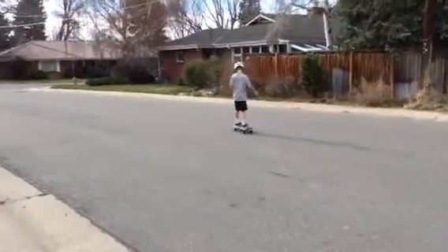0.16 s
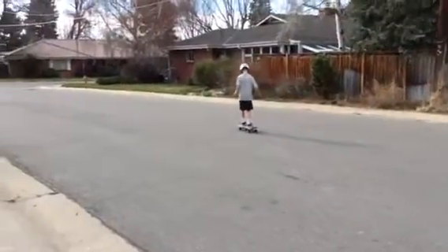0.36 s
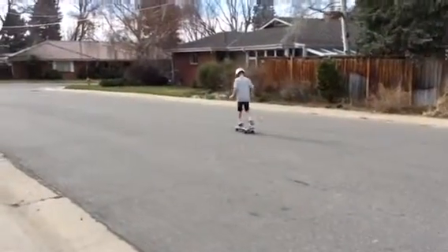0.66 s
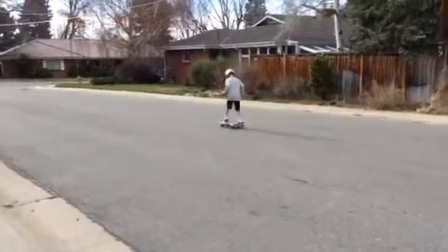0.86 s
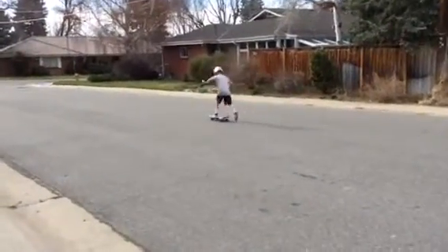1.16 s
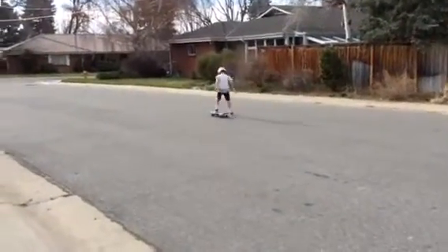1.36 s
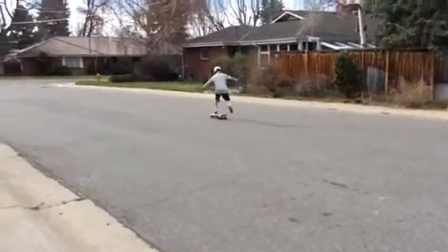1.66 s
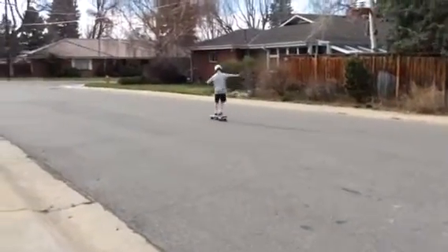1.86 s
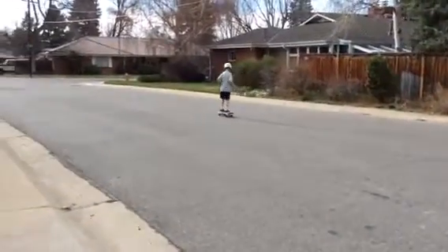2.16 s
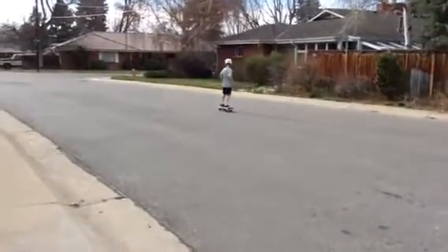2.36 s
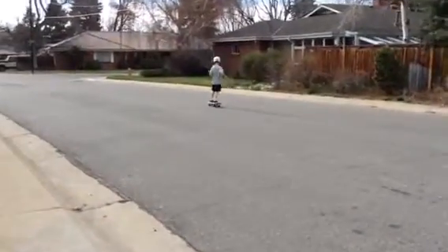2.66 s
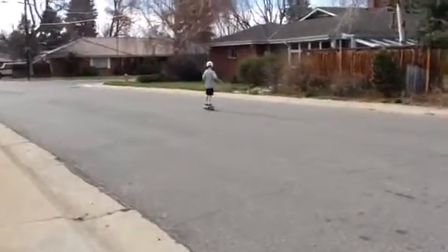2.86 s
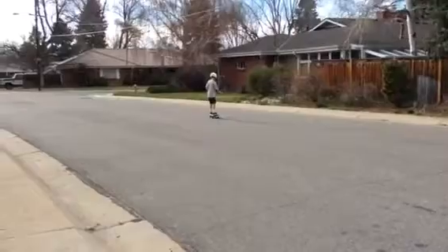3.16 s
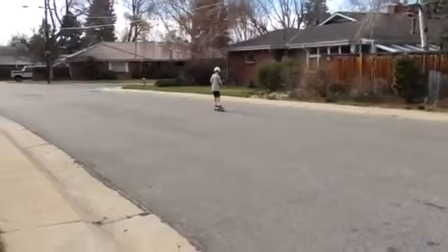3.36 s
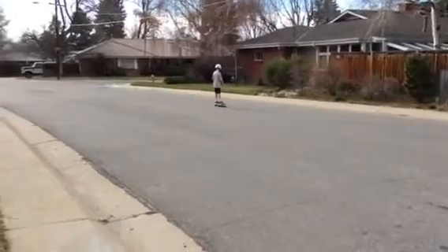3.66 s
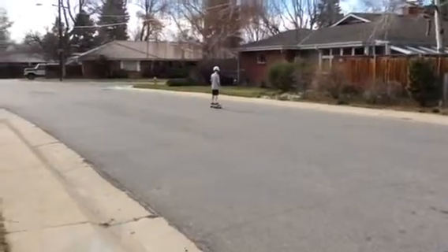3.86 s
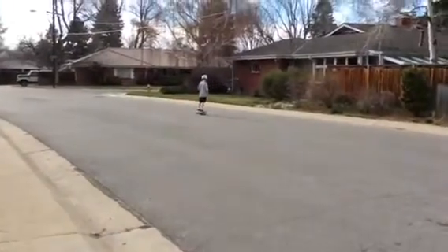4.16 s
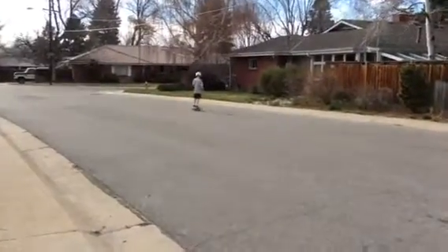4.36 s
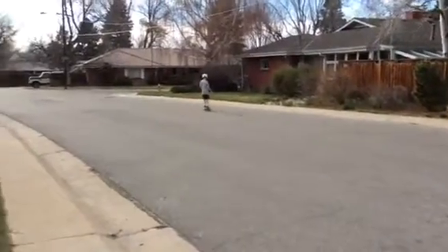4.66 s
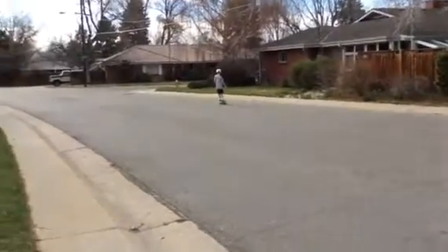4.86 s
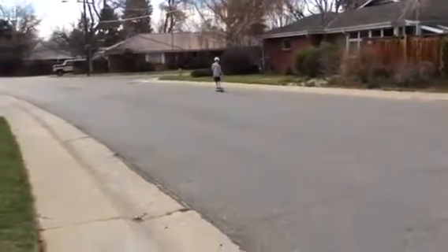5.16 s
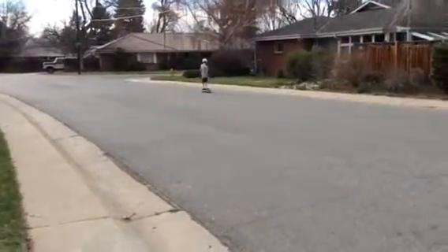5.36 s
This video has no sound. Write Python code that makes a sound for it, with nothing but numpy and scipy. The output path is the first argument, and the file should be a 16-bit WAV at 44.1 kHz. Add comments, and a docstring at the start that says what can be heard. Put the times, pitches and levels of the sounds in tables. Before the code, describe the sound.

A quiet open-air street with a low distant traffic drone, light wind and very faint hiss. From the start a skateboard rolls over rough asphalt: a soft, grainy, hollow rumble with raspy wheels, swelling and dipping, and bright little axle ticks. The ticks are frequent during the first three seconds, then sparser as the board moves off, while the roll keeps wavering quietly. Dull deck knocks fall near 1.6 and 2.0 seconds. Close to the microphone, shoes crunch faintly on grit at about 0.3 and 1.0, more clearly at 2.4, and with a sharp, brittle crackling snap at 4.05-4.15. Soft wind thumps come around 3.1-3.5 and 5.2 seconds; barely audible high squeaks appear near 1.1, 3.3 and 4.5. At about 5.45 something brushes the microphone case, with a brief falling whistle-like scrape, followed immediately by a loud, boomy knock that dominates everything.

```python
"""In a quiet street a skateboard rolls away over rough asphalt, over far traffic and a light wind.
Random grit impulses excite resonances of deck, wheels and axles; axle ticks and dull knocks ring modes.
Filtered noise makes traffic, wind and hiss, and enveloped grains make shoes crunch on grit close by.
Windowed sines are puffs of wind thumping the microphone; gliding sines are faint squeaks.
At the end noise bands and struck modes are something brushing and knocking the recorder's case."""
import sys
import numpy as np
from scipy import signal
from scipy.io import wavfile

SR = 44100
rng = np.random.default_rng(int(sys.argv[2]) if len(sys.argv) > 2 else 0)


def generate_wav(signal):
    """Clip the signal to [-1, 1] and save it as 16-bit WAV at the path in sys.argv[1]."""
    frames = np.transpose(np.atleast_2d(signal))
    scaled = np.clip(frames, -1, 1) * 32767
    pcm = np.round(scaled).astype(np.int16)
    wavfile.write(sys.argv[1], SR, pcm)


N = 242550


def from_db(db):
    """Level law: amplitude is 10 to the power of dB / 20."""
    return 10 ** (np.asarray(db) / 20)


def rms_one(x):
    """Normalisation: the signal is scaled to unit root mean square."""
    return x / np.sqrt(np.mean(x ** 2) + 1e-20)


def in_time(rows, outside=None):
    """Linear interpolation: each column of a breakpoint table becomes a curve, sample by sample."""
    s, *columns = np.transpose(rows)
    t = np.arange(N) / SR
    return [np.interp(t, s, column, outside, outside) for column in columns]


def drift(rate_hz):
    """Low-pass random process: noise at every 40th sample through a double pole; spread 1."""
    r = np.exp(-2 * np.pi * rate_hz * 40 / SR)
    noise = rng.standard_normal(N // 40 + 2002)
    slow = signal.lfilter([1], [1, -2 * r, r * r], noise)[2000:]   # the onset of the filter is dropped
    return np.interp(np.arange(N) / 40, np.arange(len(slow)), rms_one(slow))


def butter(x, hz, kind, order=2):
    """Maximally flat (Butterworth) filtering."""
    return signal.sosfilt(signal.butter(order, hz, kind, fs=SR, output="sos"), x)


def resonate(x, peaks):
    """Modal superposition: parallel two-pole resonances of alternating sign."""
    out = 0
    for k, (hz, width, db) in enumerate(peaks):
        r = np.exp(-np.pi * width / SR)
        zeros = [(1 - r * r) / 2, 0, (r * r - 1) / 2]
        poles = [1, -2 * r * np.cos(2 * np.pi * hz / SR), r * r]
        out = out + (-1) ** k * from_db(db) * signal.lfilter(zeros, poles, x)
    return out


def ring(clicks, hz, t60):
    """Impulse response of one mode: a unit click starts a decaying sine of height 1."""
    r = from_db(-60 / (t60 * SR))
    w = 2 * np.pi * hz / SR
    return signal.lfilter([0, np.sin(w)], [1, -2 * r * np.cos(w), r * r], clicks + 1e-18)


def clicks_at(events):
    """Impulse train: one single-sample impulse per event."""
    out = np.zeros(N)
    for s, db, *_ in events:
        out[round(s * SR)] = from_db(db)
    return out


def grains(per_s, spread_db):
    """Shot noise: random impulses of uneven size and sign; rms 1."""
    excess = np.minimum(rng.exponential(1, N), 5)
    sizes = from_db(spread_db * excess) * rng.choice([-1, 1], N)
    return rms_one(sizes * (rng.random(N) < per_s / SR))


def puffs(clicks, t60):
    """Exponential decay: each click starts a short burst of noise that dies away."""
    envelope = signal.lfilter([1], [1, -from_db(-60 / (t60 * SR))], clicks + 1e-18)
    return envelope * rng.standard_normal(N)


def banded(sources, spectrum, patchy_db):
    """Band synthesis: half-octave bands, each with its own level and flicker; rms 1."""
    out, together = 0, drift(4.0)
    edges = 22 * 2 ** np.arange(0, 10, .5)
    hz, db = np.transpose(spectrum)
    for k, (low, high) in enumerate(zip(edges, edges[1:])):
        level_db = np.interp(np.log(low * high) / 2, np.log(hz), db)
        flicker_db = patchy_db * (0.21 * together + drift(10.2))
        band = butter(sources[k % 2], [low, high], "band")   # neighbours use different noises
        out = out + from_db(level_db + flicker_db) * band
    return rms_one(out)


# The street: t/s, drone level/dB before +3 dB, traffic and wind level/dB before +1 dB, hiss level/dB
STREET_DB = [(0.0, -57.5, -59, -85), (0.35, -63, -60, -80), (0.53, -62, -60.5, -82),
             (0.7, -57.5, -59, -81.5), (1.2, -61, -60.5, -80), (2.8, -64, -58, -77.5),
             (3.45, -73, -57, -82), (3.75, -89, -56.5, -77.5), (4.1, -79, -55.5, -80),
             (4.3, -66.5, -57.5, -77.5), (5.45, -62.5, -58.5, -72)]
# Engine drone resonances, applied twice: f/Hz, width/Hz, level/dB per pass
DRONE = [(54.2, 9.2, 6), (86.5, 15.6, 6.5)]
# Relative spectral density of traffic and wind: f/Hz, level/dB per Hz
TRAFFIC = [(30, -13), (60, -9.5), (130, -0.5), (240, -3.5), (400, -13.5), (700, -11), (1500, -42.5),
           (3000, -47)]
# Relative spectral density of the faint hiss: f/Hz, level/dB per Hz
AIR = [(880, -37), (1500, -29), (2730, -5), (3050, -22), (6070, -7.5), (8080, -36), (8910, -8.5),
       (15800, -51)]


def street():
    """Superposition of incoherent noise: far engine drone, traffic and wind, and a faint hiss."""
    drone_db, traffic_db, air_db = in_time(STREET_DB)
    drone = rms_one(resonate(resonate(rng.standard_normal(N), DRONE), DRONE))
    traffic = banded(rng.standard_normal((2, N)), TRAFFIC, patchy_db=3.5)
    air = banded(rng.standard_normal((2, N)), AIR, patchy_db=.8)
    return from_db(drone_db + 3.0) * drone + from_db(traffic_db + 1.0) * traffic + from_db(air_db) * air


# Puffs of wind: t/s, peak level/dB, f/Hz
THUMPS = [(0.167, -42.5, 67.3), (2.248, -50, 59), (3.149, -37.5, 94), (3.465, -39.5, 71.4),
          (4.41, -45, 116), (5.16, -40.5, 82), (5.189, -34, 153), (5.236, -35, 101), (5.334, -44.5, 76.6)]


def thumps():
    """Wind pressure on the microphone: each puff is nearly three cycles of a windowed sine."""
    out = np.zeros(N)
    for s, db, hz in THUMPS:
        t = np.arange(round(2.88 / hz * SR)) / SR
        start = round((s - .7 / hz) * SR)
        pulse = np.hanning(len(t)) * np.sin(2 * np.pi * hz * t)
        out[start:][:len(t)] += from_db(db) * pulse
    return out


# Gliding whistles: t/s, length/s, first f/Hz, last f/Hz, amplitude level/dB before the flutter
SQUEAKS = [(1.03, .13, 11300, 10350, -86), (1.16, .06, 10350, 10350, -87), (3.2, .2, 8850, 8750, -85),
           (3.405, .09, 9100, 8500, -81), (4.39, .17, 12600, 11000, -88), (4.56, .19, 11000, 10700, -88)]
SQUEAK_EDGE_S = 0.0072


def squeaks():
    """Frequency modulation: faint wavering whistles, perhaps a bearing or a far bird."""
    out, t = 0, np.arange(N) / SR
    flutter = from_db(3.5 * drift(30.0))
    waver_hz = 100 * drift(120.0)
    for s, length, from_hz, to_hz, db in SQUEAKS:
        hz, = in_time([(s, from_hz), (s + length, to_hz)])
        gate = np.clip(np.minimum(t - s, s + length - t) / SQUEAK_EDGE_S, 0, 1)
        tone = np.sin(2 * np.pi * np.cumsum(hz + waver_hz) / SR)
        out = out + gate * from_db(db) * flutter * tone
    return out


# Brushing the case: t/s, hiss level/dB, whistle f/Hz, whistle level/dB before its sine carrier, rumble level/dB
BRUSH = [(5.37, -79, 12340, -72, -87), (5.44, -64, 11300, -54, -52), (5.457, -55, 9330, -35.5, -45.5),
         (5.467, -39.5, 8440, -46, -25), (5.485, -37, 8500, -73, -15.5), (5.51, -39, 8600, -52, -28)]
# Knocks on the case: t/s, impulse level/dB before filter and modes
BUMPS = [(5.4645, -28), (5.4715, -14), (5.4765, -15), (5.4815, -9), (5.4862, -3.5), (5.4925, -12)]
# Modes of the case: f/Hz, level/dB before -1 dB, t60/s
CASE = [(50.6, -3, 0.94), (218, -6, 0.033), (346, -2, 0.02), (494, -1.5, 0.024), (703, -1.5, 0.03),
        (820, -4, 0.018), (1590, -1.5, 0.026)]


def handling():
    """Friction noise and struck modes: hiss, a broad falling whistle, rumble, and knocks ringing the case."""
    hiss_db, whistle_hz, whistle_db, rumble_db = in_time(BRUSH, outside=-200)
    hiss = butter(rng.standard_normal(N), [2500, 10000], "band")
    hiss = rms_one(butter(hiss, 9200, "low", order=4))
    # low noise times a sine is a band of noise around the whistle's pitch
    carrier = np.sin(2 * np.pi * np.cumsum(whistle_hz) / SR)
    whistle = rms_one(butter(rng.standard_normal(N), 1500, "low")) * carrier
    rumble = butter(rng.standard_normal(N), 840, "low", order=3)
    rumble = rms_one(butter(rumble, 188, "high"))
    blows = butter(clicks_at(BUMPS), [70, 550], "band")
    case = from_db(-1.0) * sum(from_db(db) * ring(blows, hz, t60) for hz, db, t60 in CASE)
    return from_db(hiss_db) * hiss + from_db(whistle_db) * whistle + from_db(rumble_db) * rumble + case


# Stones cracking: t/s, burst level/dB before its band filter, f/Hz
SNAPS = [(0.38, -55, 11000), (2.3722, -37, 3500), (2.4345, -50, 7000), (4.0443, -30, 4900),
         (4.0485, -35, 5200), (4.052, -37, 4800), (4.0572, -36, 5000), (4.0625, -37, 4500),
         (4.0710, -31, 3500), (4.0735, -19, 3300), (4.078, -30, 5000), (4.082, -26, 4400),
         (4.0955, -33, 3300), (4.101, -35, 2600), (4.111, -34, 2500), (4.1205, -38, 2500),
         (4.126, -32, 3000), (4.1265, -35, 9000)]
SPLINTER_T60_S = .012


def snaps():
    """Brittle fracture: a sharp click and decaying splinter noise, broad around the stone's pitch."""
    out, t = np.zeros(N), np.arange(round(.02 * SR)) / SR
    noises = rng.standard_normal((len(SNAPS), len(t)))
    for (s, db, hz), noise in zip(SNAPS, noises):
        burst = noise * from_db(-10 - 60 * t / SPLINTER_T60_S)
        burst[0] = -2.5   # the click
        band = [hz / 2.8, min(hz * 1.73, 16000)]
        out[round(s * SR):][:len(t)] += from_db(db) * butter(burst, band, "band")
    return out


# Shoes on grit: t/s, swell/s, fade/s, start below top/dB (scaled for each part),
# body level/dB, rasp level/dB, sizzle level/dB, first rasp f/Hz, last rasp f/Hz
CRUNCH = [(0.2, 0.1, 0.064, 7, -64, -65, -72, 2200, 2700),
          (0.975, 0.023, 0.037, 13, -62, -56.5, -67, 3000, 3000),
          (2.372, 0.038, .03, 4, -54.5, -53.5, -61, 2100, 3500),
          (4.035, 0.039, 0.056, 9, -47, -44, -46, 4900, 3000)]
# Relative spectral density of the grit: f/Hz, level/dB per Hz
GRIT = [(150, -20), (250, 7), (475, 10), (684, 0), (1020, 15), (1630, -17.5), (3260, -10.5), (7230, -18.5),
        (8450, -13), (13700, -29), (15800, -22)]
SET_DOWN_S, TAIL_DB_PER_S = 0.0096, 144   # the tail slope is approximate
HELD_SHARE = .6   # share of the swell that holds before it grows
RASP_WIDTH_SHARE = 0.42   # of its pitch


def crunch():
    """Granular fracture: dense cracks under a sole set in, swell, fade and trail off, with lone snaps."""
    cracks = [grains(7000, spread_db=3.0) * from_db(1.8 * drift(80.0)) for _ in range(2)]
    grit = banded(cracks, GRIT, patchy_db=1.2)
    body = butter(grit, 1080, "low", order=4)
    sizzle = butter(grit, 4000, "high")
    rough = rms_one(butter(cracks[0], [1500, 6000], "band"))
    out = snaps()
    for s, swell, fade, swell_db, body_db, rasp_db, sizzle_db, from_hz, to_hz in CRUNCH:
        top, end = s + swell, s + swell + fade
        # the rasp changes pitch as the sole slides
        moved, = in_time([(s + HELD_SHARE * swell, 0), (top, 1)])
        first, last = [rms_one(resonate(rough, [(hz, RASP_WIDTH_SHARE * hz, 0)])) for hz in (from_hz, to_hz)]
        rasp = np.sqrt(1 - moved) * first + np.sqrt(moved) * last
        # part, level/dB, share of the swell in dB, fade/dB
        parts = [(body, body_db, 0.8, 17), (-rasp, rasp_db, 1.0, 17), (sizzle, sizzle_db, 0.5, 13)]
        for part, db, share, fades_db in parts:
            under_db = share * swell_db
            held_until = s + SET_DOWN_S + HELD_SHARE * (swell - SET_DOWN_S)
            shape_db, = in_time([(s, -40), (s + SET_DOWN_S, -under_db), (held_until, -under_db),
                                 (top, 0), (end, -fades_db), (end + SET_DOWN_S, -fades_db - 7.5),
                                 (end + .3, -fades_db - 6 - .3 * TAIL_DB_PER_S)], outside=-200)
            out += from_db(db + shape_db) * rms_one(part)
    return out


# Axle ticks placed one by one, loud and faint: t/s, jolt level/dB before colour, modes and gain
TICKS = [(0.0777, -48), (0.14, -49.5), (0.2318, -47), (0.405, -60), (0.4393, -55), (0.553, -52),
         (0.581, -57), (0.6656, -54), (0.7182, -58), (0.7446, -55), (0.788, -58), (0.822, -62),
         (0.8519, -52), (0.93, -49.5), (0.9716, -48), (1.026, -51), (1.0715, -52), (1.194, -48),
         (1.2365, -55), (1.3006, -56), (1.3425, -64), (1.3753, -47.5), (1.4523, -57), (1.4837, -67),
         (1.6017, -48), (1.6363, -48.5), (1.6863, -43), (1.7226, -62), (1.767, -57), (1.8466, -48),
         (1.8632, -45.5), (1.8895, -50), (1.927, -52), (2.005, -64), (2.0544, -52), (2.1407, -59),
         (2.1851, -61), (2.2035, -52), (2.2262, -51), (2.3579, -49), (2.477, -50), (2.5346, -54),
         (2.606, -70), (2.6632, -57), (2.721, -50), (2.7601, -61), (2.7856, -56), (2.9502, -51),
         (3.1203, -56), (3.5154, -62), (3.5743, -59), (3.7075, -59), (3.7953, -55), (3.8062, -53),
         (3.8536, -57), (3.9125, -56), (4.2232, -52), (4.351, -55), (4.368, -53), (4.8394, -57),
         (4.8846, -50), (5.1507, -53), (5.2265, -57), (5.2704, -49)]
# Modes of a tick, applied twice: f/Hz, width/Hz, level/dB per pass
TICK_MODES = [(6030, 750, -2.5), (6660, 700, -1), (7700, 870, -2), (9300, 3000, -7.5)]
SMALL_TICKS_PER_S = 110   # mean rate of the random ticks
SMALL_TICK_OVER_DB, SMALL_TICK_SPREAD_DB = 12, 3   # jolt level over the hiss, before colour, modes and gain
TICK_COLOUR_DB = 4   # scales the spread of a mode's strength from tick to tick
TICK_RISE_S = 0.0014


def ticks(hiss_db):
    """Impact excitation: loose axle parts tick; every tick strikes each mode with its own strength."""
    random_db = SMALL_TICK_OVER_DB + hiss_db + rng.normal(0, SMALL_TICK_SPREAD_DB, N)
    random_ticks = (rng.random(N) < SMALL_TICKS_PER_S / SR) * from_db(random_db)
    rise = np.hanning(round(TICK_RISE_S * SR) + 3) / (TICK_RISE_S * SR / 2 + 1)
    out = 0
    for mode in TICK_MODES:
        colour = from_db(TICK_COLOUR_DB * rng.uniform(-1.7, 1, N))
        jolts = (clicks_at(TICKS) + random_ticks) * colour
        bursts = puffs(np.convolve(jolts, rise)[:N], t60=0.011)
        out = out + resonate(resonate(bursts, [mode]), [mode])
    return from_db(7.0) * out


def shifting(x, peaks):
    """Modulated resonance: steep peaks swell and fade singly as the rider's weight shifts; rms 1."""
    steep = [resonate(resonate(x, [peak]), [peak]) for peak in peaks]
    return rms_one(sum((-1) ** k * from_db(1.8 * drift(6.0)) * part for k, part in enumerate(steep)))


# The ride: t/s, wheel roar level/dB, wheel rasp level/dB, axle hiss level/dB before its high-pass
RIDE = [(0.0, -64.5, -74.5, -80.5), (0.14, -62.5, -75.5, -78.5), (0.27, -63.5, -66.5, -68.5),
        (0.43, -69.5, -72.5, -82.5), (0.53, -67.5, -80, -91), (0.6, -69, -73, -81), (0.7, -65, -70, -79),
        (0.88, -58, -69.5, -68), (1.04, -61.5, -67.5, -76.5), (1.29, -64.5, -71.5, -77.5),
        (1.58, -58, -67.5, -75.5), (1.79, -61, -66, -70.5), (1.96, -59, -71, -74.5),
        (2.03, -56.5, -64, -72), (2.2, -61.5, -68.5, -79.5), (2.33, -66, -67, -79), (2.5, -66, -72.5, -81),
        (2.7, -60.5, -65, -72.5), (2.95, -60, -67, -78.5), (3.28, -62.5, -72.5, -80.5),
        (3.66, -59, -67.5, -75), (4.08, -64.5, -70.5, -72.5), (4.31, -63, -73.5, -80),
        (4.37, -60, -70, -74), (4.54, -61, -72.5, -84), (4.72, -63.5, -72, -82.5),
        (4.93, -57.5, -71, -78.5), (5.23, -63, -73.5, -76.5), (5.45, -63.5, -67.5, -73)]
# Tail turned to the microphone: t/s, share 0-1
TAIL = [(0, 0.22), (2.15, 0.2), (2.95, 0.85), (3.65, 0.68), (4.07, 0.02), (4.55, 0.76), (5.45, 0.37)]
# Deck from the side, applied twice: f/Hz, width/Hz, level/dB per pass, relative
SIDE_ON = [(594, 395, -3.5), (993, 864, -9)]
# Deck from behind, applied twice: f/Hz, width/Hz, level/dB per pass, relative
TAIL_ON = [(561, 170, 5), (1040, 390, -0.5), (1213, 170, 9.5), (1485, 290, -6.5)]
# Wheel resonances: f/Hz, width/Hz, relative level/dB
WHEELS = [(1996, 560, 5), (2500, 660, 4.5), (2708, 297, 3), (3380, 375, -2.5), (3844, 430, -2),
          (4950, 550, -13)]
# Loose metal of the axles: f/Hz, width/Hz, relative level/dB
AXLE = [(6000, 4700, 8), (7940, 5000, 7), (9860, 11000, -11.5)]
# Dull knocks, of the deck over cracks and one under the crunching shoe:
# t/s, impulse level/dB before filter and modes
KNOCKS = [(1.5568, -30.5), (1.5765, -43), (1.5985, -41), (2.022, -36), (2.308, -50), (2.3715, -43),
          (2.478, -47), (3.324, -46)]
# Modes of the dull knocks: f/Hz, level/dB before -7.5 dB, t60/s
KNOCK_MODES = [(713, 2.5, 0.018), (1070, -0.5, 0.0082), (2300, -15, 0.02)]


def board():
    """Forced vibration: asphalt grain shakes deck, wheels and axles; the colour shifts as the board turns."""
    roar_db, rasp_db, hiss_db = in_time(RIDE)
    tail = np.clip(in_time(TAIL)[0], 0, 1)
    bumpy_db = .8 * drift(12.0) + 1.6 * drift(40.0)
    road = grains(5000, spread_db=3.5) * from_db(bumpy_db)

    side_on = shifting(road, SIDE_ON)
    tail_on = shifting(road, TAIL_ON)
    roar = from_db(roar_db) * (np.sqrt(1 - tail) * side_on + np.sqrt(tail) * tail_on)

    # each wheel resonance swells and fades on its own as the load shifts
    wheels = sum((-1) ** k * from_db(1.6 * drift(5.0)) * resonate(road, [peak])
                 for k, peak in enumerate(WHEELS))
    rasp = from_db(rasp_db) * rms_one(butter(wheels, [1500, 5500], "band"))

    chatter = grains(1500, spread_db=3.0) * from_db(0.73 * bumpy_db + 2.0 * drift(71.0))
    axle = from_db(hiss_db) * rms_one(resonate(chatter, AXLE))
    axle += ticks(hiss_db)

    blows = butter(clicks_at(KNOCKS), 3400, "low")
    knocks = from_db(-7.5) * sum(from_db(db) * ring(blows, hz, t60) for hz, db, t60 in KNOCK_MODES)
    return roar + rasp + butter(axle, 3400, "high") + knocks


def scene():
    """Linear superposition: all sources add up in one channel."""
    return (street() + thumps() + squeaks() + handling() + crunch() + board())[None]


MIC_LOW_CUT_HZ, CUTOFF_HZ = 34, 15800


def record(dry):
    """Band limiting and soft saturation: deep bass is lost, loud peaks are rounded, the top is cut."""
    rounded = .8 * np.tanh(butter(dry, MIC_LOW_CUT_HZ, "high") / .8)
    top_cut = signal.ellip(12, .5, 70, CUTOFF_HZ, fs=SR, output="sos")   # ripple and stopband in dB
    return signal.sosfilt(top_cut, rounded)


dry = scene()
out = record(dry)
generate_wav(out)
```